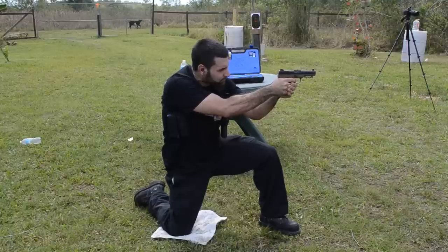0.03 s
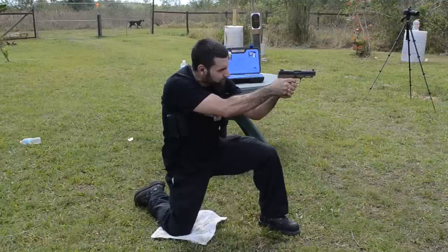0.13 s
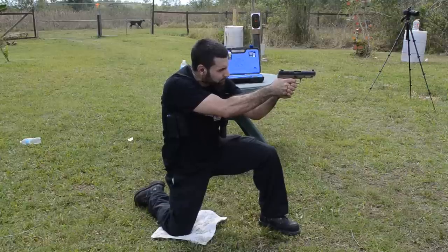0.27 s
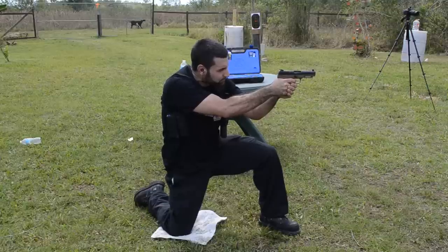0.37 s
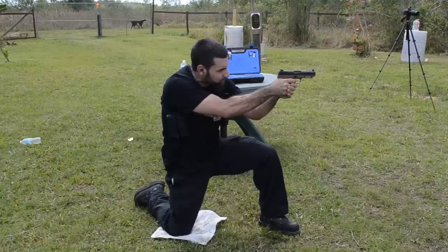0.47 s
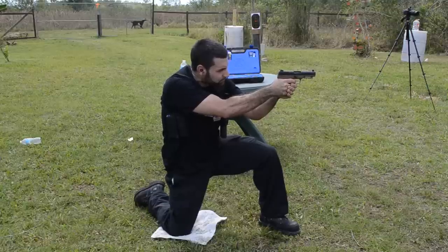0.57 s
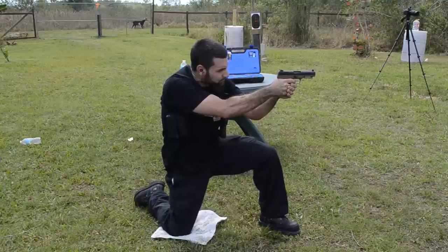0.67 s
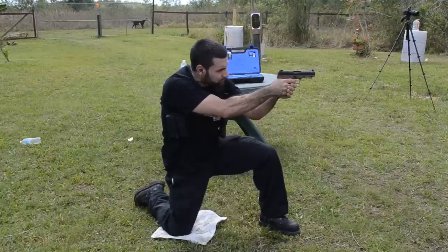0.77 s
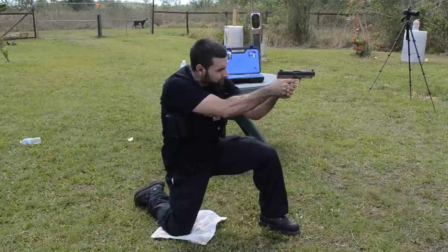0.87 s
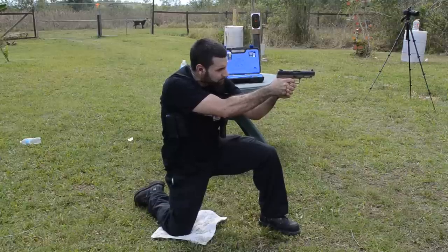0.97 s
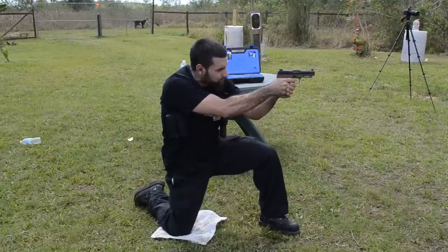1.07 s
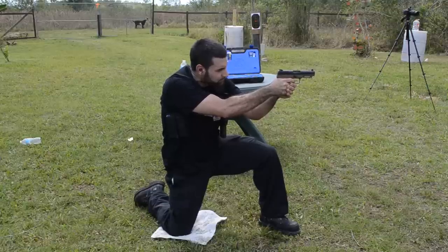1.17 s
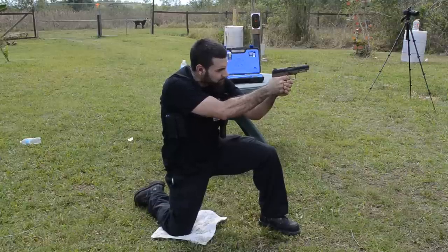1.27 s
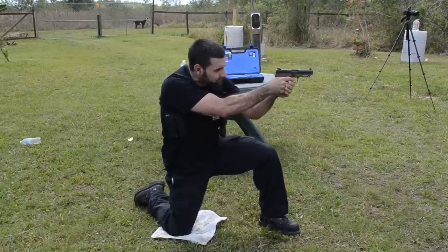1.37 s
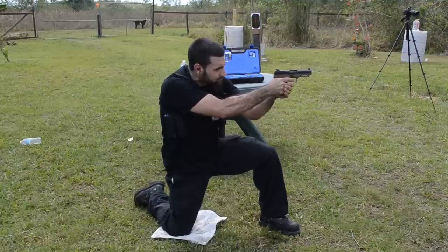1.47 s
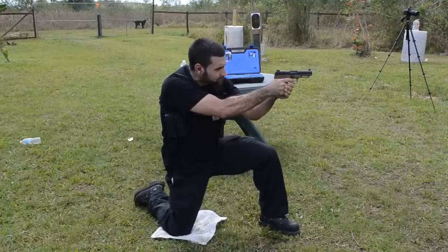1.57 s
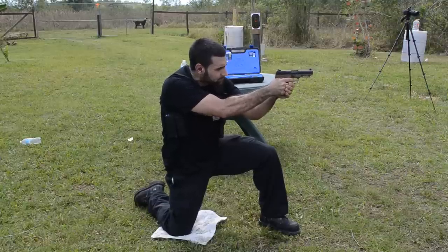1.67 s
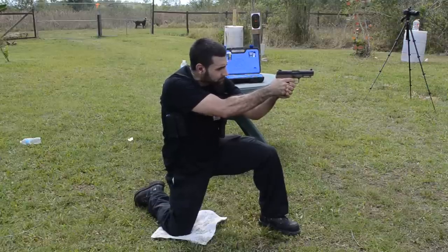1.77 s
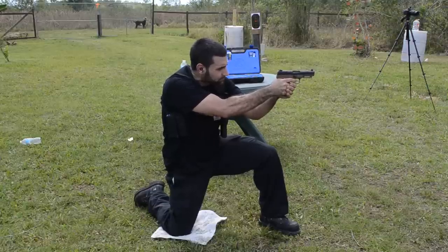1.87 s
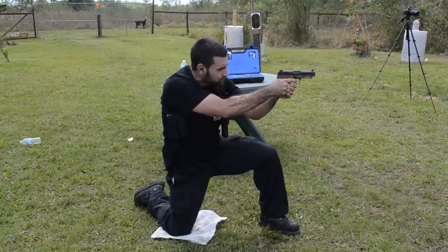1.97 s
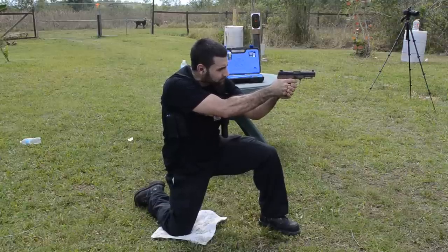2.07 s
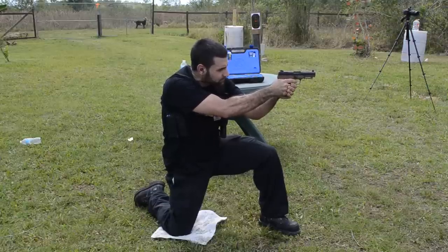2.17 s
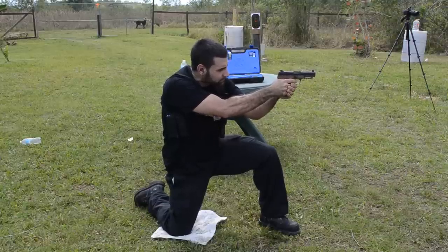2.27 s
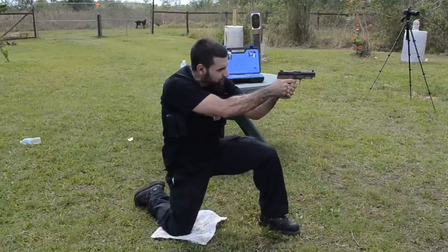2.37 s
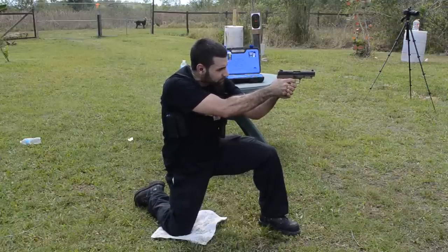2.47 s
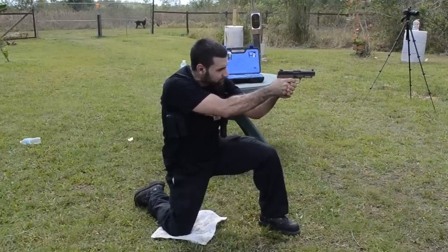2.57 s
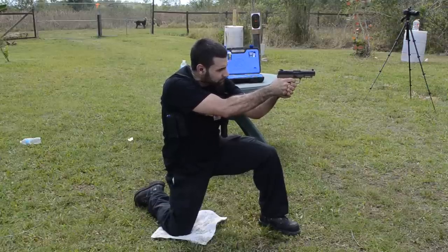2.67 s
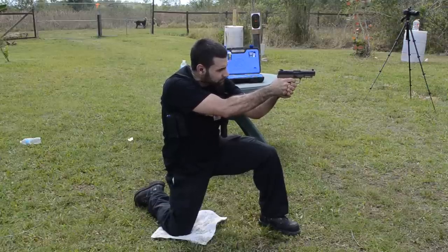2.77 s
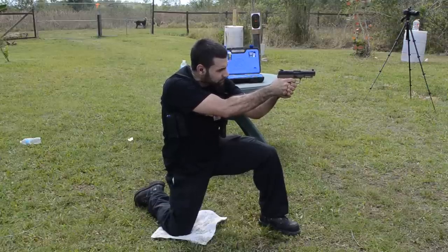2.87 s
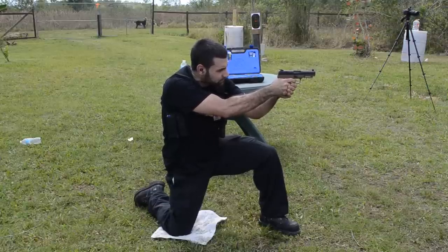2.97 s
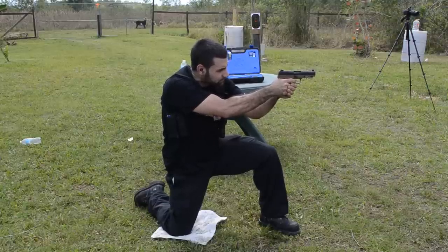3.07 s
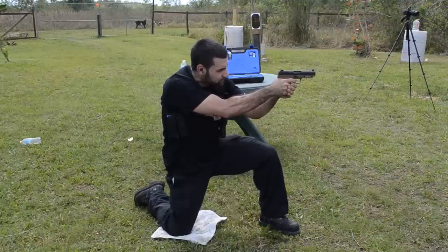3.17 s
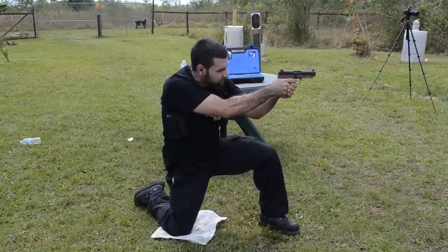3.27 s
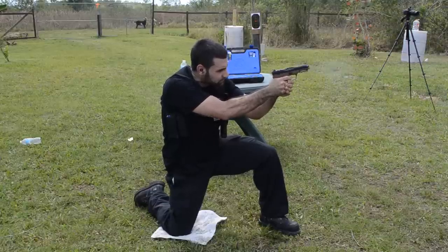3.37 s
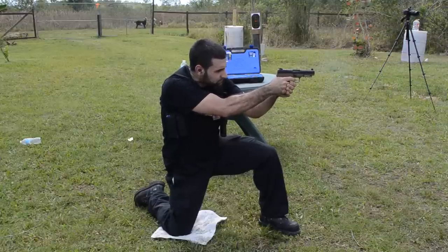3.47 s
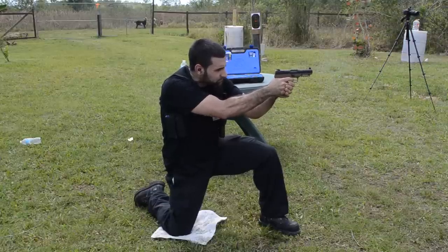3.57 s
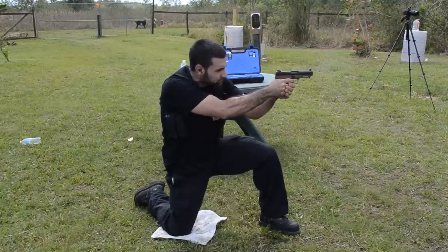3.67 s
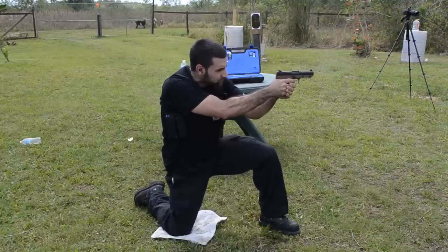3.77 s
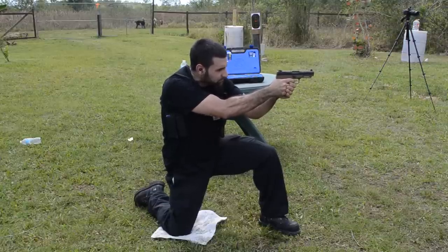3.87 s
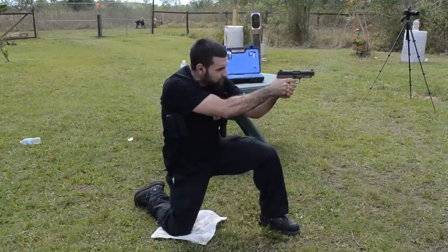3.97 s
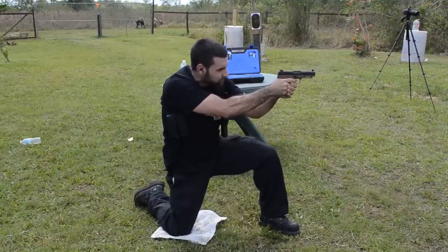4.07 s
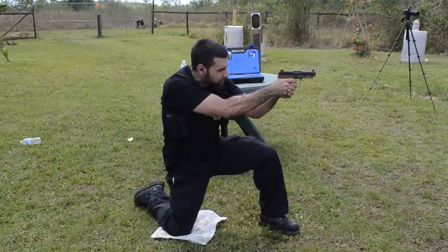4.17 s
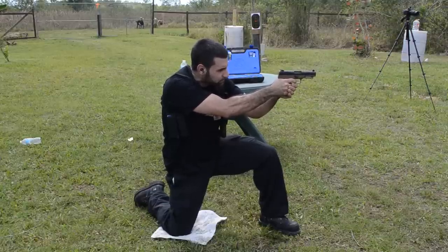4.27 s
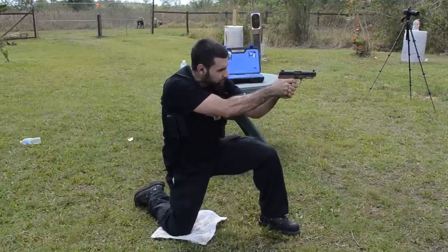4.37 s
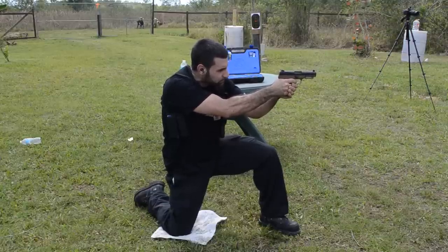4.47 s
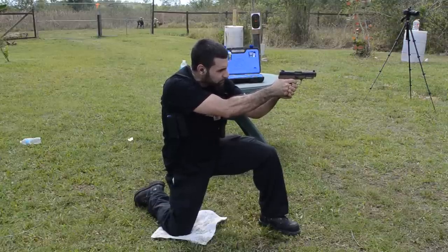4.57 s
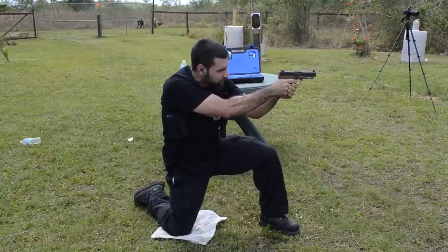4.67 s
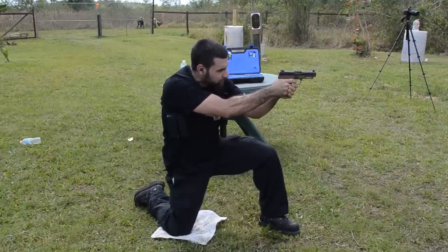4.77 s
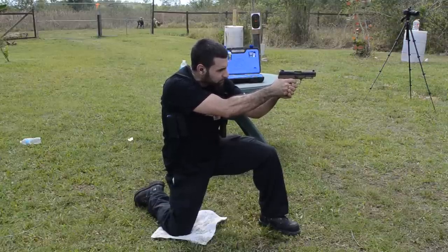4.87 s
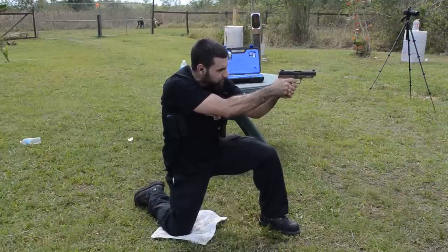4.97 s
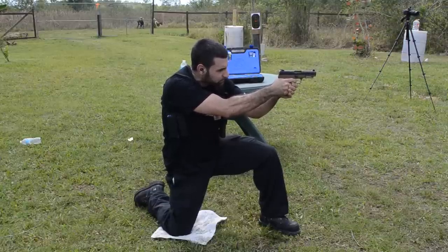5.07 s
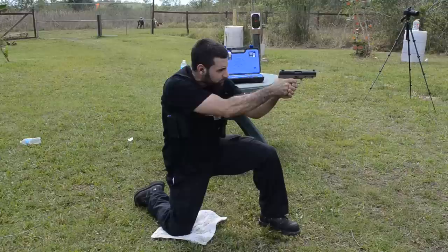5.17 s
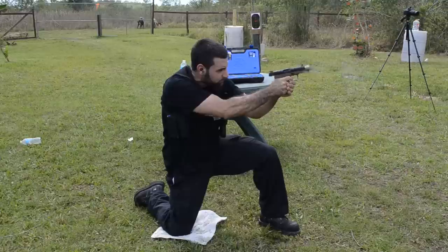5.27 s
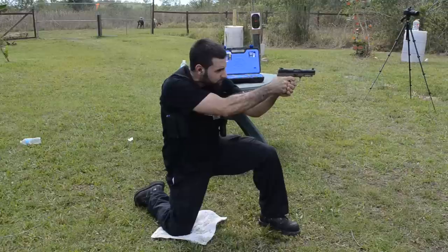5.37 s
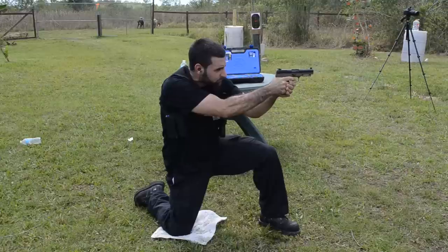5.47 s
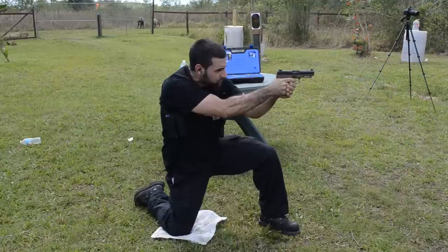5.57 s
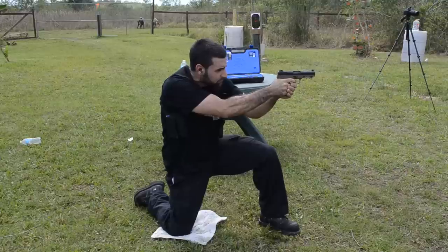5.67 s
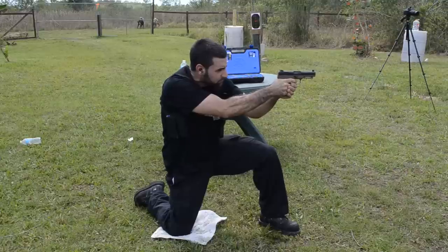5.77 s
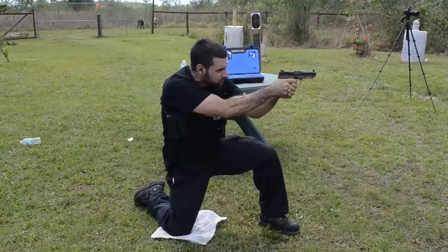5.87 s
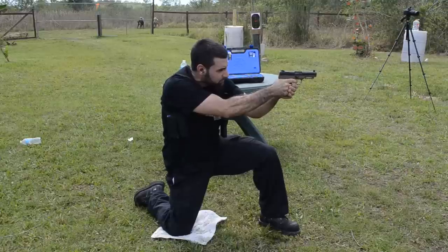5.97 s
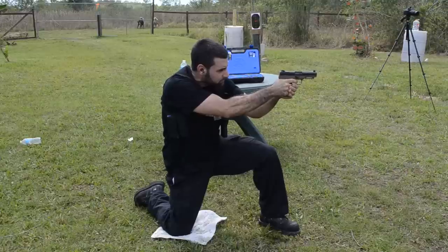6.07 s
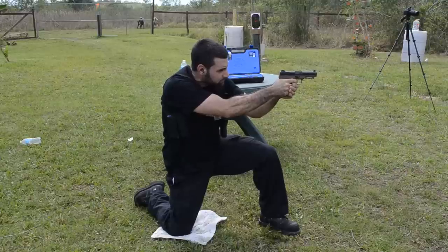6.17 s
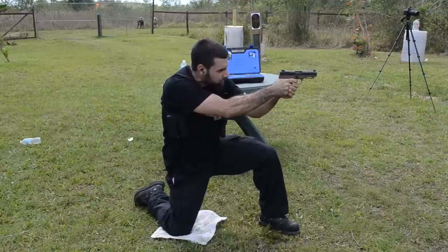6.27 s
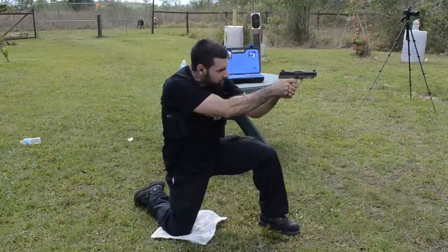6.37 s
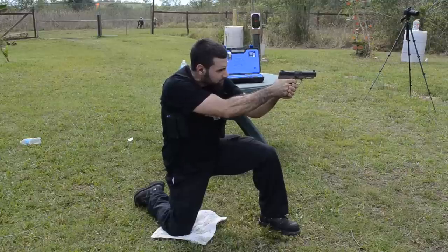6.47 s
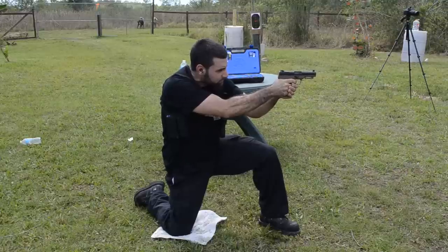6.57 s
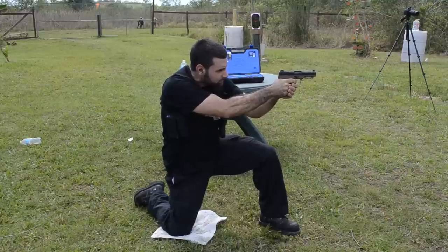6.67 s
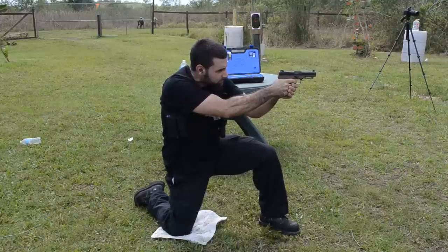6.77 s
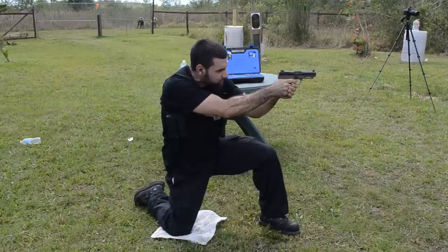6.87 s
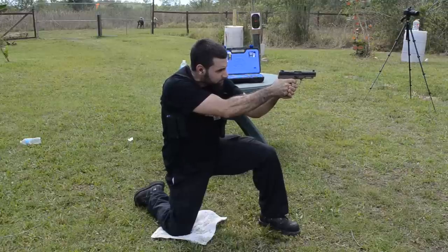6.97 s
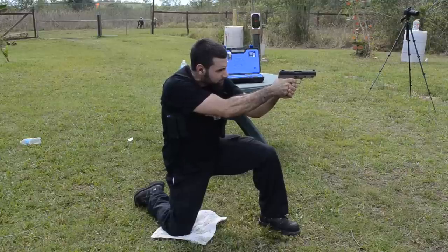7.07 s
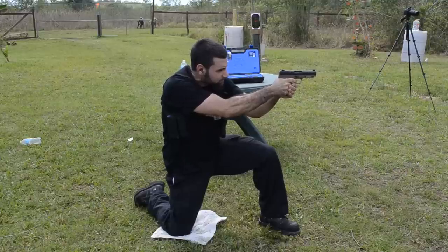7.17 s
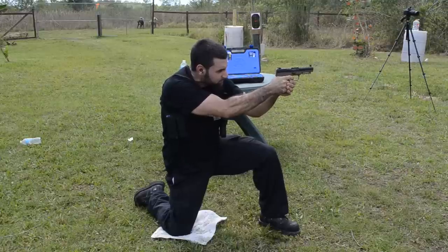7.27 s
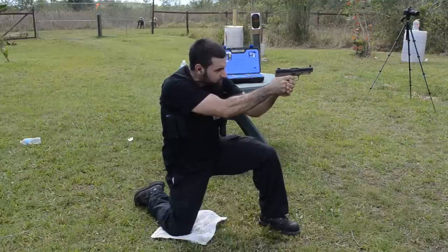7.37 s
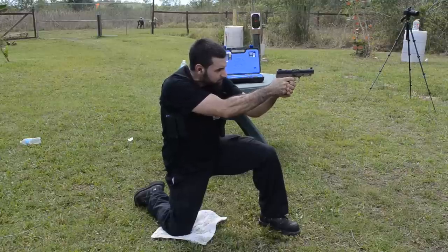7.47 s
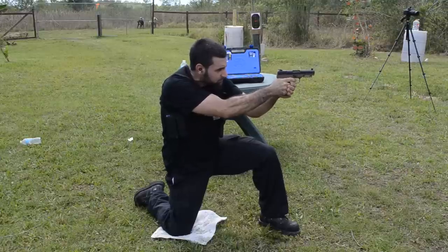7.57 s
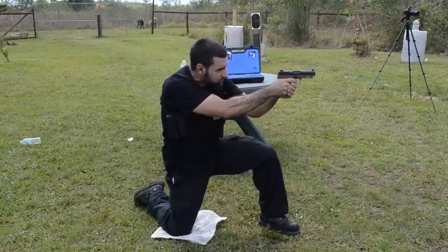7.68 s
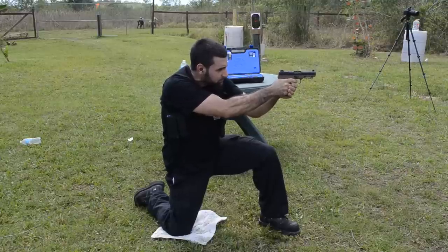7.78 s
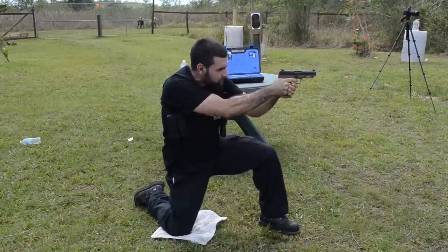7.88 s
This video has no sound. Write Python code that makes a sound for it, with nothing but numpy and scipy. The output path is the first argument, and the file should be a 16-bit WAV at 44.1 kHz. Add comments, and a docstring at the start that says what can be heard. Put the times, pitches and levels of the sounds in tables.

```python
"""A grass range: a pistol fires four slow shots a few metres from the microphone, which each overloads.
Each blast is a shock wave with a crack, a rush of gas and a thump; the slide clacks just after it.
Nearby surfaces reflect it as slaps, the tree line scatters it into a swelling roar, and far woods
answer a second later. Between the shots lie quiet field air, distant insects and a light breeze on the
microphone. A little rustling in the grass comes before the first shot."""
import sys
import numpy as np
from scipy import signal
from scipy.fft import rfft, irfft, next_fast_len
from scipy.io import wavfile

SR = 44100
rng = np.random.default_rng(int(sys.argv[2]) if len(sys.argv) > 2 else 0)


def transcribe(signal):
    """Save signal, clipped to [-1, 1], as a 16-bit WAV file at the path in sys.argv[1]."""
    frames = np.atleast_2d(signal).T
    limited = np.clip(frames, -1, 1)
    pcm = np.round(limited * 32767).astype(np.int16)
    wavfile.write(sys.argv[1], SR, pcm)


N = 350154
TIME = np.arange(N) / SR
SIZE = next_fast_len(N, real=True)
FREQS = np.maximum(np.fft.rfftfreq(SIZE, 1 / SR), 1)


# Shots: t/s, shock level/dB, shock f/Hz, crack level/dB, gas level/dB, thump level/dB, echo gain/dB
SHOTS = [(1.3339, 22, 1200, 6.5, 1.5, -32, 0), (3.4479, 22, 1373, 11.5, -0.5, -31, -0.5),
         (5.3660, 20.5, 1597, 4, 0, -29, -0.5), (7.3130, 16.5, 1154, 6, 0, -23, 0)]
def pistol(roar_db=-18.0, stir_s=9.8):
    """Superposition of direct and reflected sound; moving air decorrelates the longer paths most."""
    still_paths, near = woods(), slaps()
    stirred_paths = signal.hilbert(woods(), SIZE)[:N]
    stirred_share = np.clip(TIME / stir_s, 0, 1)
    out = np.zeros(N)
    for s, shock_db, hz, crack_db, gas_db, thump_db, echo_db in SHOTS:
        stirred = np.real(stirred_paths * np.exp(2j * np.pi * rng.random()))   # new phase each shot
        paths = np.sqrt(1 - stirred_share) * still_paths + np.sqrt(stirred_share) * stirred
        echoes = near + from_db(roar_db) * paths
        direct = blast(shock_db, hz, crack_db, gas_db, thump_db) + slide()
        out += delayed(direct + from_db(echo_db) * echoes, s)
    return out


# Spectrum of the muzzle gas: f/Hz, relative level/dB
GAS_SPECTRUM = [(40, -13), (120, -11.5), (300, -2.5), (700, -0.5), (1100, 1), (1900, -1.5), (3000, -12),
                (5000, -23), (9000, -29), (16000, -33)]
def blast(shock_db, hz, crack_db, gas_db, thump_db, thump_hz=32):
    """Impulse excitation: the shock sets the microphone ringing; crack, gas and thump die more slowly."""
    shock = -from_db(shock_db) * np.sin(2 * np.pi * hz * TIME) * dying(t60=0.0022)
    crack = from_db(crack_db) * noise(bell(hz=5800, width_hz=10000)) * dying(t60=0.0032)
    gas = from_db(gas_db) * noise(colour(GAS_SPECTRUM)) * dying(t60=0.04)
    thump = from_db(thump_db) * np.sin(2 * np.pi * thump_hz * TIME) * dying(t60=0.047)
    return shock + crack + gas + thump


def slide(after_s=0.016, clack_db=-29.0):
    """Impact noise: the slide cycles just after the blast with a short broadband clack."""
    return delayed(from_db(clack_db) * rng.standard_normal(N) * dying(t60=0.045), after_s)


# Discrete echoes: delay t/s, relative peak level/dB, f/Hz
REFLECTIONS = [(.0118, -8.5, 610), (.0140, 5, 837), (.0138, -9, 2372), (0.0156, -8, 260),
               (.0146, -18.5, 135.9), (.0323, -6, 980), (.0665, -7, 895), (.126, -6, 986),
               (0.139, -16, 285), (.171, -10.5, 253), (.186, -21, 338), (0.29, -25, 142.9),
               (.329, -24.5, 149), (0.406, -24.5, 148.6), (.41, -13, 905), (.565, -24, 1028),
               (1.027, -36, 1310), (1.059, -29, 1030), (1.059, -44.5, 2270)]
def slaps(rise_cycles=0.94, near_rise_s=0.0003, smear_s_per_s=0.014, low_cut_hz=85):
    """Reflection: each hard surface returns a dulled blast of a few cycles, large far ones a boom."""
    out = np.zeros(N)
    for s, peak_db, hz in REFLECTIONS:
        # deep echoes swell more slowly, but a short path limits the smearing
        rise_s = min(rise_cycles / hz, near_rise_s + smear_s_per_s * s)
        age = np.minimum(TIME / rise_s, 50)
        envelope = from_db(peak_db) * age * np.exp(1 - age)
        out += delayed(envelope * np.sin(2 * np.pi * hz * TIME), s)
    return signal.sosfilt(signal.butter(3, low_cut_hz, "high", fs=SR, output="sos"), out)


# Spectrum scattered by the trees: f/Hz, relative level/dB
ROAR_SPECTRUM = [(29, -60), (50, -34.5), (130, -0.5), (250, -5.5), (394, -9.5), (490, -8.5), (649, -4.5),
                 (773, -2.5), (899, -3), (1020, -1.5), (1390, -5), (1690, -11), (2720, -17), (7240, -44.5),
                 (9000, -70), (11700, -88), (19800, -120)]
# Narrow peaks and a dip in the roar: f/Hz, bandwidth/Hz, gain/dB
ROAR_BANDS = [(253, 10, -1), (661, 16, 3.5), (903, 8.3, 7.5), (1000, 18, 1), (1186, 14, 1.5)]
def woods(bass_hz=260, middle_hz=700, boom_db=-2, clump_db=1.49, low_cut_hz=105):
    """Scattering: many small echoes merge into a roar; air absorption takes treble from long paths."""
    emphasis = from_db(sum(db * bell(hz, width) for hz, width, db in ROAR_BANDS))
    echoes = rfft(noise(colour(ROAR_SPECTRUM) * emphasis), SIZE)
    clumps_db = clump_db * drift(rate_hz=70)   # trunks and bushes answer in bunches
    extra_path_s = np.minimum(TIME, 0.8) - 0.18   # absorption tilts the spectrum about its 0.18 s shape
    centres = np.geomspace(125, 8000, 7)
    out = np.zeros(N)
    for hz, selector in zip(centres, np.eye(len(centres))):
        band_gain = np.interp(np.log(FREQS), np.log(centres), selector)
        band = irfft(echoes * band_gain, SIZE)[:N]
        bass = np.interp(np.log(hz), np.log([bass_hz, middle_hz]), [1, 0])
        loss_db = 8.0 * max(hz / 1000 - 1, 0) * extra_path_s   # 8 dB/s for each kHz above 1 kHz
        gain_db = (1 - bass) * clumps_db + bass * boom_db - loss_db
        out += band * roar_envelope(hz, bass) * from_db(gain_db)
    # the roar is cut below about 100 Hz, so it carries no deep rumble
    return signal.sosfilt(signal.butter(4, low_cut_hz, "high", fs=SR, output="sos"), out)


# Scattering zones (near grass and fence, tree line, woods behind it, far woods):
# fullest at t/s, build-up t/s, middle level/dB, bass level/dB, low cut f/Hz, decay rate/(dB/s)
ZONES = [(.06, 0.066, -4, 0.5, 218, 68.5), (.145, .048, 5.5, 2, 149.6, 41.5),
         (.37, 0.2, -10.5, -3.5, 80, 42.5), (1.03, 0.077, -27, -33, 100, 25)]
def roar_envelope(hz, bass, hold_s=0.045, bass_extra_db_per_s=30):
    """Incoherent addition: in one band (bass: 0-1) each zone builds, holds and fades; the powers add."""
    t = TIME[::40]
    power = 0
    for s, build_s, middle_db, bass_db, lowest_hz, fade in ZONES:
        attack = np.exp(-np.clip((s - t) / build_s, 0, 10) ** 2)
        release_db = (fade + bass * bass_extra_db_per_s) * np.maximum(t - s - hold_s, 0)
        amplitude = attack * from_db((1 - bass) * middle_db + bass * bass_db - release_db)
        power += amplitude ** 2 / (1 + (lowest_hz / hz) ** 4)
    return np.interp(TIME, t, np.sqrt(power))


# Puffs of breeze: t/s, peak level/dB, half length t/s
PUFFS = [(.376, -47, .01), (1.206, -48, .012), (2.144, -44, .022), (4.741, -56, .06), (6.252, -50, 0.083)]
# Their spectrum: f/Hz, relative level/dB
PUFF_SPECTRUM = [(20, -8.5), (60, 17.5), (95, 3.5), (150, -9), (300, -50), (2000, -80)]
def breeze():
    """Wind noise: each puff on the microphone is a brief, low pressure fluctuation."""
    return noise(colour(PUFF_SPECTRUM)) * swells(PUFFS)


# Spectrum of the field air: f/Hz, relative level/dB
AIR_SPECTRUM = [(12, -39), (20, -8), (87, 4.5), (108, 7.5), (135, -8.5), (229, -9), (367, -11.5), (398, -8),
                (889, -5.5), (2850, -21), (3090, -18.5), (3650, -25.5), (12400, -50.5), (15000, -44.5)]
def air(level_db=-57.5):
    """Stationary noise: the open field keeps a steady, quiet hush."""
    return from_db(level_db) * noise(colour(AIR_SPECTRUM))


# Rustles and ticks in the grass: t/s, peak level/dB, half length t/s
RUSTLES = [(0.11, -59.5, .005), (.297, -63, 0.012), (.455, -61, 0.0057), (0.581, -54, .002),
           (0.629, -58, .003), (0.664, -55.5, .0025), (.668, -61, .04), (.973, -59.5, .008),
           (1.247, -61, 0.019)]
# Spectrum of the rustles and the early hush: f/Hz, relative level/dB
RUSTLE_SPECTRUM = [(100, 0.5), (300, -5.5), (1000, -8.5), (2500, -8), (5000, -26), (12000, -34.5),
                   (16000, -56)]
def rustles_and_hush(hush_db=-64.5, until_s=1.5):
    """Amplitude-modulated noise: before the first shot, brief rustles and a slightly louder hush."""
    hush = from_db(hush_db) * during(0, until_s)
    return noise(colour(RUSTLE_SPECTRUM)) * (hush + swells(RUSTLES))


# Insect trills: start t/s, end t/s, f/Hz, bandwidth/Hz, level/dB
TRILLS = [(0, 1.2, 3144, 110, -72.5), (0, 7.3, 3450, 70, -79.5)]
def insects():
    """Narrow-band noise: distant insects trill, each about one frequency."""
    return sum(from_db(db) * during(start, end) * noise(bell(hz, width))
               for start, end, hz, width, db in TRILLS)


def from_db(db):
    """Amplitude ratio of a level."""
    return 10 ** (np.asarray(db) / 20)


def colour(points):
    """Spectral envelope, interpolated in log frequency."""
    hz, db = np.transpose(points)
    return from_db(np.interp(np.log(FREQS), np.log(hz), db))


def bell(hz, width_hz):
    """Resonance curve of height 1."""
    return 1 / (1 + (2 * (FREQS - hz) / width_hz) ** 2)


def noise(gain):
    """Filtered Gaussian noise, rms 1."""
    x = irfft(rfft(rng.standard_normal(SIZE)) * gain, SIZE)[:N]
    return x / np.sqrt(np.mean(x ** 2) + 1e-20)


def drift(rate_hz):
    """Low-pass random fluctuation, rms 1."""
    return noise(1 / (1 + (FREQS / rate_hz) ** 2))


def dying(t60):
    """Exponential decay of 60 dB in t60 seconds."""
    return from_db(np.maximum(-60 * TIME / t60, -300))


def delayed(x, s):
    """Pure delay of s seconds."""
    start = int(round(s * SR))
    return np.concatenate([np.zeros(start), x[:N - start]])


def swells(events):
    """Sum of Gaussian envelopes."""
    return sum(from_db(db) * np.exp(-np.minimum(((TIME - s) / half_s) ** 2, 50))
               for s, db, half_s in events)


def during(start, end, edge_s=0.11):
    """Trapezoidal window: 1 from start to end, with ramps outside."""
    return np.clip(1 + np.minimum(TIME - start, end - TIME) / edge_s, 0, 1)


# Difference between the capsules: f/Hz, side level relative to mid/dB
SIDE_SPECTRUM = [(60, -29.5), (250, -56.5), (1000, -74), (1800, -54), (2700, -32.5), (4200, -14.5),
                 (6400, -15), (10000, -25.5)]
def scene():
    """Mid-side stereo: two close capsules differ by a slight, bounded quadrature signal in the treble."""
    mid = pistol() + air() + insects() + breeze() + rustles_and_hush()
    bounded = rfft(np.clip(mid, -1, 1), SIZE)
    side = irfft(bounded * 1j * colour(SIDE_SPECTRUM), SIZE)[:N]
    return np.array([mid + side, mid - side])


def record(dry, whine_hz=15698, whine_db=-79.5, cutoff_hz=16000):
    """Overload: the blasts clip at full scale; the electronics whine faintly; a low-pass cuts the top."""
    whine = from_db(whine_db) * np.sqrt(2) * np.sin(2 * np.pi * whine_hz * TIME)
    low_pass = signal.ellip(10, .1, 70, cutoff_hz, fs=SR, output="sos")
    return signal.sosfilt(low_pass, np.clip(dry, -1, 1) + whine)


dry = scene()
out = record(dry)
transcribe(out)
```